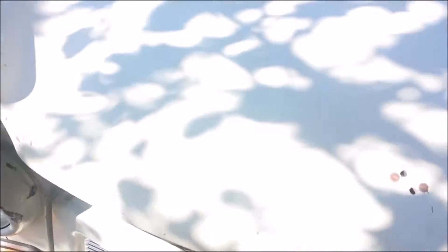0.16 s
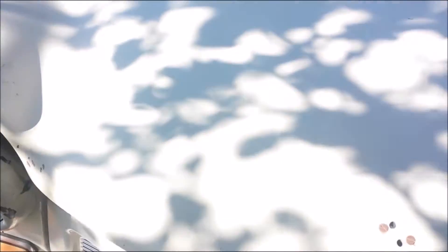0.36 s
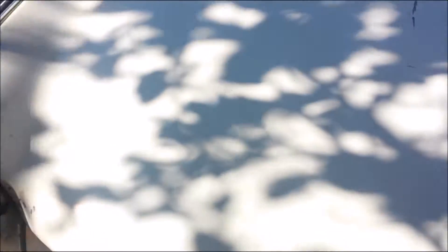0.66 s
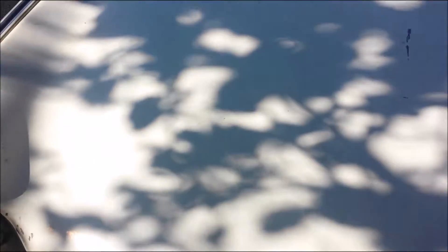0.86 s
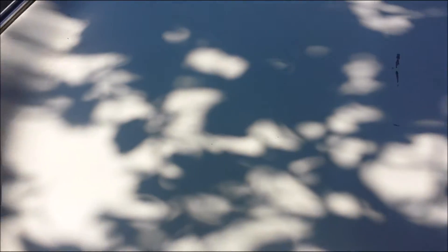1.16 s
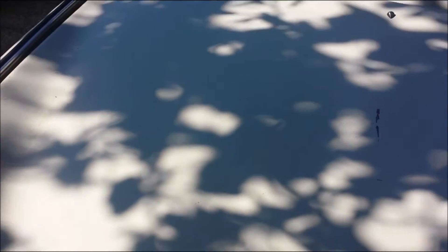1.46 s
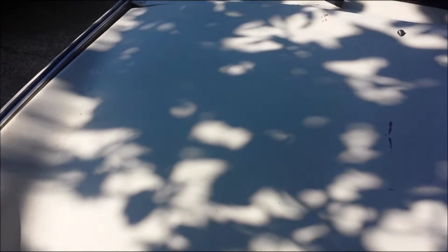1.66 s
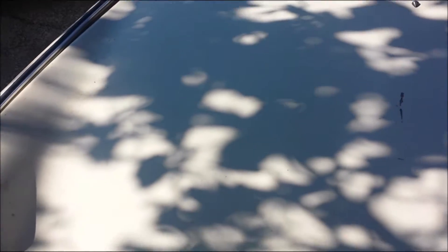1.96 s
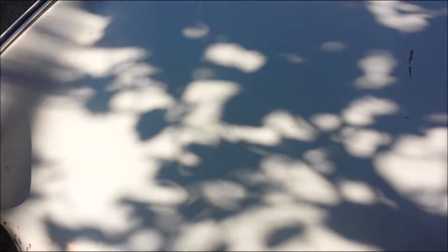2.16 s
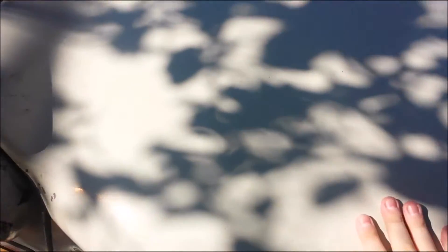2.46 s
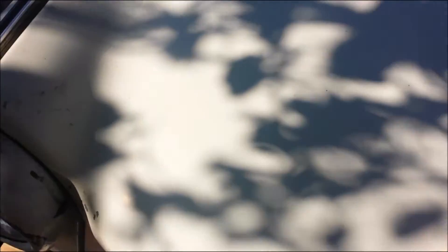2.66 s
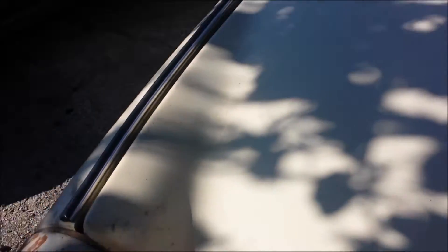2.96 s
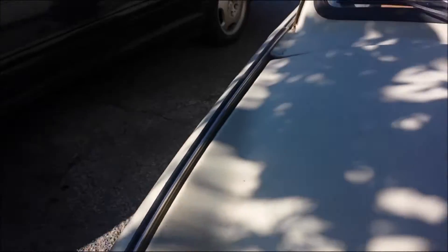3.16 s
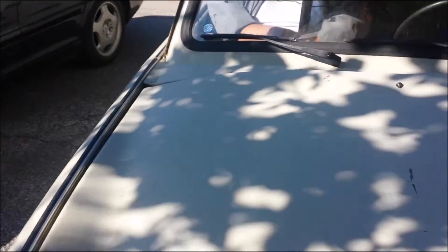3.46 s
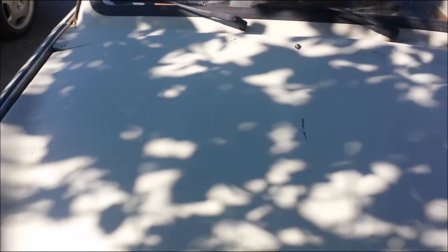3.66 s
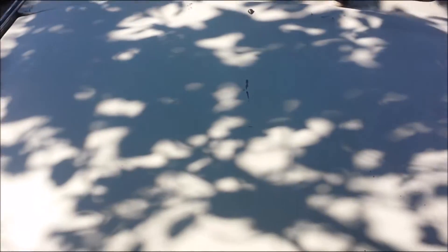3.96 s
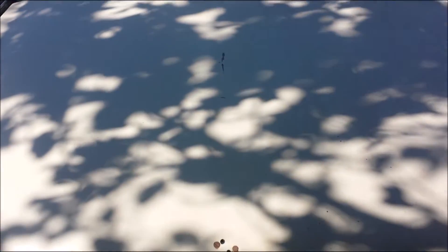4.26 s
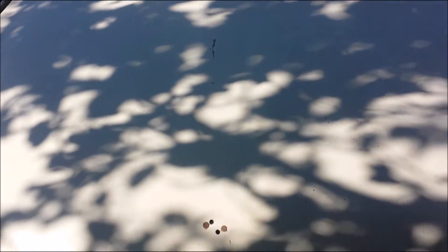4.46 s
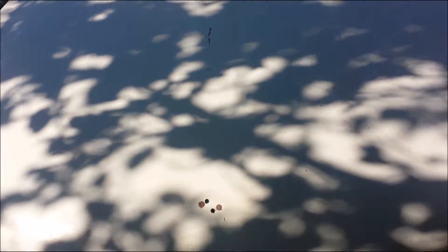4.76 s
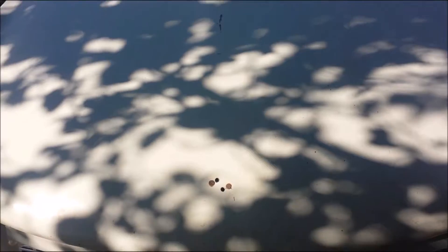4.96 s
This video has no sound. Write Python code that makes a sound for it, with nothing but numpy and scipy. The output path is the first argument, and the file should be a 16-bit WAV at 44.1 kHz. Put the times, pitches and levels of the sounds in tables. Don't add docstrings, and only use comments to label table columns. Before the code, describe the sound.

A metal car bonnet drops with hollow booming thunks, rattles and settles, then is pressed shut, followed by close rustling and gritty crackles outdoors.

```python
import sys
import numpy as np
from scipy import signal
from scipy.fft import rfft, irfft, next_fast_len
from scipy.io import wavfile
from scipy.ndimage import uniform_filter1d

SR = 44100
rng = np.random.default_rng(int(sys.argv[2]) if len(sys.argv) > 2 else 0)


def amplitude_ratio(level_db):
    exponent = np.asarray(level_db, float) / 20
    return 10 ** exponent


def store_pcm(level_fs):
    pcm = np.round(np.clip(level_fs, -1, 1) * 32767).astype(np.int16)
    wavfile.write(sys.argv[1], SR, np.atleast_2d(pcm).T)


N = 225030


def at(table, hz):
    table_hz, values = np.array(table).T
    return np.interp(np.log(hz), np.log(table_hz), values)


def pan(db):
    return amplitude_ratio(np.array([db, -db]) / 2)


def walk(rate):
    held = int(SR / rate)
    steps = np.repeat(rng.standard_normal(N // held + 1), held)
    return 1.2 * uniform_filter1d(steps, held)[:N]


def add(out, s, x):
    i = int(s * SR)
    out[..., i:i + x.shape[-1]] += x[..., :N - i]


def ring(hz, t60, phase, t):
    return np.exp(-np.log(1000) * t / t60) * np.sin(2 * np.pi * hz * t + phase)


# (frequency [Hz], likeness [0 to 1])
PORT_LIKENESS = [(30, 0.85), (200, 1), (600, 1), (2000, 0.28), (8000, 0.8), (15000, 0.2)]


def bands(per_octave=2):
    size = next_fast_len(N)
    hz = np.arange(size // 2 + 1) * SR / size + 1e-3
    like = np.clip(at(PORT_LIKENESS, hz), 0, 1)
    a, b = rfft(rng.standard_normal((2, size)))
    pair = np.array([a, like * a + np.sqrt(1 - like ** 2) * b])
    for centre in 25 * 2 ** np.arange(0, 9.4, 1 / per_octave):
        bell = np.cos(np.pi / 2 * np.clip(per_octave * np.log2(hz / centre), -1, 1))
        band = irfft(pair * bell, size)[:, :N]
        yield centre, centre / 3, band / band.std()


# (frequency [Hz], level [dB per Hz])
HISS_COLOUR = [(290, -22), (500, -23.5), (1250, -14), (1440, -19), (2160, -2.5), (6610, -3), (14900, -14),
               (16000, -25)]


def hiss(hz, wide_db):
    return amplitude_ratio(-62.5 + at(HISS_COLOUR, hz) + wide_db - 40.5)


# (frequency [Hz], level [dB], end [s])
WHISTLE = (15000, -65.5, 1.35)


def whistle():
    hz, db, end = WHISTLE
    now = np.arange(N) / SR
    return amplitude_ratio(db + 2.0 * walk(20)) * np.sin(2 * np.pi * hz * now) * (now < end)


# (time [s], level [dB])
TRAFFIC_SWELL = [(0.0, -43), (0.5, -40), (0.9, -27.5), (1.2, -46.5), (1.5, -38.5), (1.77, -44),
                 (1.9, -46.5), (2.2, -48), (2.46, -44), (2.97, -46), (3.48, -58), (3.71, -46.5),
                 (4.22, -39), (4.5, -41), (5.1, -47)]
# (frequency [Hz], level [dB per Hz])
TRAFFIC_COLOUR = [(20, -23), (45, -0.5), (132, -3), (220, -11), (374, -11.5), (809, -25.5), (2600, -30),
                  (4400, -103)]


def traffic(hz, wide_db, now):
    swell_db = np.interp(now, *np.transpose(TRAFFIC_SWELL))
    gusts_db = 2.2 * walk(5.9)
    return amplitude_ratio(swell_db + at(TRAFFIC_COLOUR, hz) + wide_db - 23.5 + gusts_db)


# (full from [s], held [s], level [dB], sheen above 7 kHz [dB re level], left minus right [dB])
STROKES = [(0.0, .17, -50, 2.5, -1), (.17, 0.17, -50, 0.5, -2), (0.389, 0.11, -46, 3.5, -1),
           (1.405, 0.027, -41.5, 8, -3), (1.8, .15, -60, 0.5, -1.5), (2.08, 0.2, -59.5, -0.5, -2),
           (2.36, 0.055, -47, 2, -3), (2.462, 0.43, -53.5, 3, -4.5), (3.42, 0.24, -64.5, 4, -6.5),
           (3.699, 0.017, -42, 1, 0.5), (3.83, .06, -40.5, 2, 4.5), (3.91, 0.023, -37, -1.5, 2.5),
           (4.036, 0.12, -35, 2.5, 2.5), (4.19, 0.11, -38, 6.5, 2.5), (4.3, 0.013, -42.5, 3, 3),
           (4.35, 0.076, -44, -1.5, 1), (4.476, 0.018, -41, 3, -3), (4.562, 0.075, -43, 0.5, 0.5),
           (4.65, 0.13, -49, 2, 5), (4.798, 0.11, -43.5, 2, 8), (4.92, 0.54, -47, 4.5, 3.5)]


def strokes(now):
    s, held, db, sheen_db, pan_db = np.transpose(STROKES)[:, :, None]
    rise_db = 276.5 * np.maximum(s - now, 0)
    fall_db = 206 * np.maximum(now - s - held, 0)
    power = amplitude_ratio(2 * np.maximum(db - rise_db - fall_db, -120))
    total = power.sum(axis=0)
    return 10 * np.log10(total), (power * sheen_db).sum(axis=0) / total, (power * pan_db).sum(axis=0) / total


def fibre_jerks():
    spikes = amplitude_ratio(np.minimum(3.0 * rng.exponential(size=N), 8)) * (rng.random(N) < .012)
    jerks = signal.lfilter([1], [1, -.975], spikes)
    return (.85 + jerks / jerks.mean() * .36) * amplitude_ratio(1.2 * walk(40))


# (frequency [Hz], level [dB per Hz])
CLOTH_COLOUR = [(240, -15), (500, -13), (990, -4.5), (1760, -17), (2320, -1), (6540, -5), (11900, -17.5),
                (16000, -15)]


def cloth(hz, wide_db, jerks, level_db, sheen_db):
    sheen = np.clip(np.log2(hz / 5000), 0, 1) * (sheen_db - 0.5)
    return jerks * amplitude_ratio(level_db + sheen + at(CLOTH_COLOUR, hz) + wide_db - 38.0 + 2.0 * walk(25))


def pocket():
    hz, width_hz = 2260, 170
    sos = signal.butter(2, [hz - width_hz / 2, hz + width_hz / 2], "band", fs=SR, output="sos")
    band = signal.sosfilt(sos, rng.standard_normal((2, N)))
    rustle_db = strokes(np.arange(N) / SR)[0]
    level = np.hypot(amplitude_ratio(rustle_db - 13), amplitude_ratio(-77.5))
    return band / band.std() * level * amplitude_ratio(3.6 * walk(15))


# (time [s], peak level [dB], centre [Hz], left minus right [dB])
FINGER_TICKS = [(0.0138, -26, 5640, 4), (0.072, -34.5, 5640, 15), (0.0988, -33.5, 5460, 11),
                (0.1506, -26, 6060, -3), (0.1885, -30, 3450, 2), (0.21, -40, 2220, -11),
                (0.2573, -37.5, 2260, -6), (0.416, -33, 7700, -7), (1.0989, -38, 2830, 3),
                (1.256, -24.5, 8000, -5), (1.832, -37.5, 5500, -14), (2.0735, -41.5, 6250, 13.5),
                (2.2176, -24, 7060, -2), (2.3294, -36.5, 3080, -14.5), (2.3501, -47, 5000, -2.5),
                (2.5606, -25.5, 5700, 7.5), (2.6425, -29, 5510, 1), (2.684, -38, 6470, -3),
                (2.696, -32.5, 4750, 0), (2.721, -30, 4210, -0.5), (1.2445, -36, 6000, -1.5),
                (1.273, -36, 5800, 7), (1.4135, -21, 7500, -0.5), (2.997, -46, 10600, 2),
                (2.6564, -17, 4200, 1), (2.6654, -31, 2450, -4), (2.976, -37, 3260, -9.5),
                (2.9894, -40.5, 4770, -9.5), (3.041, -37.5, 3100, -5.5), (3.0846, -44, 3000, -0.5),
                (3.3009, -42.5, 6500, 18.5), (3.424, -45, 2300, 0), (3.4832, -39, 4270, -4),
                (3.6028, -39, 4470, -2)]
# (time [s], peak level [dB], centre [Hz], left minus right [dB])
SOLE_GRIT = [(3.6646, -31.5, 3990, -6), (3.696, -28.5, 2295, 6), (3.7994, -30.5, 6430, -5),
             (3.8351, -24.5, 4380, -3), (3.907, -27, 4500, 9), (3.912, -14.5, 4000, 2),
             (3.963, -25, 4000, 7), (3.9533, -21.5, 2910, 8), (4.056, -31.5, 6000, 5),
             (4.106, -22.5, 5500, 1), (4.211, -27, 3500, 12), (4.27, -27, 5000, 5), (4.29, -25, 5000, 5),
             (4.0449, -18.5, 2300, 7), (4.1083, -19, 2560, 5), (4.1167, -19, 3040, 15),
             (4.156, -26, 5140, 1), (4.2455, -28, 4000, 6), (4.2841, -18, 2600, 4), (4.417, -16.5, 4260, 6),
             (4.459, -18.5, 8650, -9), (4.4783, -18.5, 2800, 7), (4.484, -19.5, 3400, 7.5),
             (4.489, -26.5, 4500, 5), (4.55, -15.5, 4000, -13), (4.641, -27.5, 7000, -3),
             (4.792, -23.5, 6200, -6), (4.8, -19, 5530, 14), (4.8064, -22, 4920, 0), (4.862, -33, 4830, 10),
             (4.9831, -27, 2440, 7), (5.0855, -23.5, 4800, 9)]
# (time [s], peak level [dB], centre [Hz], left minus right [dB])
DULL_KNOCKS = [
    (4.881, -33.5, 850, -2),
    (4.895, -28.5, 960, 10),
    (4.912, -25, 1030, 1),
    (4.953, -29, 1770, 6),
]
# (time [s], peak level [dB], centre [Hz], left minus right [dB])
DRY_SNAPS = [(0.4095, -22, 7050, -6), (1.3872, -8, 8480, 2), (1.3875, -15, 3500, 0), (3.9415, -10, 2900, 6),
             (4.0034, -12, 3130, 9), (4.5455, -9.5, 8800, -9), (4.525, -7, 7560, -9.5),
             (4.5835, -14, 2480, 3.5), (4.457, -20, 6500, -4), (4.5135, -26, 5000, -4),
             (4.517, -28, 12000, -4.5), (4.556, -27, 6000, -6), (4.573, -28, 6500, -1),
             (4.647, -25, 9000, -3), (4.653, -23, 10000, -1), (4.664, -30, 8500, 0),
             (4.672, -23, 8000, -0.5), (3.941, -23.5, 9000, 3.5), (4.0036, -17, 9600, 3),
             (4.4175, -16.5, 9500, -1), (3.9075, -24, 10000, -1), (4.156, -18.5, 8400, -0.5),
             (0.602, -28, 4500, -1), (1.407, -27, 11000, -2), (1.43, -28, 10000, -2),
             (1.447, -28, 9500, -2), (1.489, -33, 8000, -2), (0.5455, -8, 650, -1), (3.629, -36, 11500, -3),
             (3.665, -36, 11000, -3), (3.77, -35, 13000, -3), (3.801, -31, 13500, -3),
             (0.743, -31, 9000, -2), (0.749, -34, 8000, -2), (4.047, -24, 8000, 2)]


def ticks():
    out, t = np.zeros((2, N)), np.arange(900) / SR
    rows = [row + (0,) for row in FINGER_TICKS + SOLE_GRIT + DULL_KNOCKS]
    rows += [row + (-11,) for row in DRY_SNAPS]
    chance = rng.standard_normal((len(rows), 2, len(t)))
    for (s, db, hz, pan_db, dry_db), (a, b) in zip(rows, chance):
        scatter_db = dry_db - 7.5 - 7 * np.log2(hz / 3000)
        snap = ring(hz, 7.6 / hz, 0, t)
        scatter = amplitude_ratio(scatter_db) * np.exp(-t / 0.0042) * np.array([a, 0.77 * a + 0.76 * b])
        sos = signal.butter(2, [hz / 2.3, min(hz * 2.23, 19000)], "band", fs=SR, output="sos")
        grain = signal.sosfilt(sos, snap + scatter)
        add(out, s + 0.0007, amplitude_ratio(db + 3.5) * pan(pan_db)[:, None] * grain)
    return out


# (frequency [Hz], level [dB], t60 [s])
LEVER_MODES = [(1193, -11, 0.21), (2125, -6, 0.11), (2190, -2.5, 0.27), (2500, -0.5, 0.11),
               (3320, -9, 0.11), (3800, -11.5, .08), (4080, -0.5, 0.073), (4450, 2, 0.099),
               (4800, -17, .09), (5500, -8, 0.069), (6400, -8, .1), (6600, -9.5, 0.06), (7260, -15, 0.07),
               (8900, -16, .05)]
# (time [s], length [s], level [dB], tilt about 3 kHz [dB per octave], left minus right [dB])
LEVER_SCRAPES = [(0.685, 0.024, -38.5, 5, 2.5), (0.716, 0.013, -51, -3, -2),
                 (0.785, 0.0088, -21.5, 5.5, -1), (1.187, 0.024, -44, 0, -2.5),
                 (1.243, 0.0099, -43.5, 0, -2.5), (1.295, 0.011, -43.5, 0, 2), (1.312, .008, -52, -2, -3),
                 (1.328, 0.0081, -34, -10.5, -2), (1.36, 0.014, -28.5, -8, 5), (1.528, 0.035, -43.5, 2, 2),
                 (1.64, 0.07, -38, -14.5, -2), (1.671, 0.015, -28.5, 2, 3), (1.691, 0.021, -23.5, 2, 3.5),
                 (1.731, 0.012, -38.5, -9, -0.5), (2.61, 0.037, -52, -4, -1), (2.729, 0.025, -29.5, 2, 3)]


def lever():
    out = np.zeros((2, N))
    chance = rng.standard_normal((len(LEVER_SCRAPES), 3, 2600))
    for (s, length, db, tilt_db, pan_db), (a, b, c) in zip(LEVER_SCRAPES, chance):
        u = np.arange(9000) / SR / length
        grit = amplitude_ratio(4.0 * uniform_filter1d(c, size=40) * 6)
        push = np.pad(np.array([a, 0.87 * a + .8 * b]) * grit, ((0, 0), (0, 6400)))
        push = push * np.exp(-u ** 3) * pan(pan_db)[:, None]
        for (hz, mode_db, t60), g in zip(LEVER_MODES, c):
            r = np.exp(-np.log(1000) * 1.8 / (t60 * SR))
            turn = 2 * np.pi * hz / SR
            mode = signal.lfilter([np.sin(turn)], [1, -2 * r * np.cos(turn), r * r], push)
            level = amplitude_ratio(db + mode_db + tilt_db * np.log2(hz / 3000) + 1.6 * g)
            add(out, s, level * mode / np.sqrt(length * SR))
    return out


def cluster(hz, db, t60, spread_hz):
    off, left, right = rng.standard_normal((3, 12))
    t = np.arange(int(min(t60, 1) * SR)) / SR
    offsets = np.linspace(-1, 1, len(off)) + .07 * off
    modes = np.array([ring(hz + spread_hz * o, t60, 0, t) for o in offsets])
    modes = modes * np.minimum(t * hz / 2.3, 1) ** 2
    weights = np.hanning(len(off) + 4)[2:-2] * (0.41 + np.array([left, 0.67 * left + 0.6 * right]))
    return amplitude_ratio(db - 6.0) * weights @ modes


# (start [s], end [s], frequency [Hz], level [dB], second harmonic
# [dB], unevenness [0 to 1])
SQUEALS = [
    (1.6705, 1.712, 2180, -16, -21, 0.47),
    (1.711, 1.746, 2190, -33, -20, 0.88),
    (4.015, 4.047, 996, -37.5, -27, .45),
    (4.052, 4.1, 1004, -37, -25, 0.27),
]
# (time [s], frequency [Hz], level [dB], t60 [s])
LATCH_CLANGS = [(0.5457, 960, -12.5, 0.13), (0.5474, 2570, -23, 0.069), (0.6865, 4230, -37, 0.09),
                (0.885, 1034, -11, 0.057), (1.1861, 3940, -39.5, 0.11), (1.1895, 2106, -38, 0.064),
                (1.2515, 2230, -41, 0.13), (1.2727, 1195, -36.5, 0.038), (1.2995, 2220, -39, 0.055),
                (1.3874, 2500, -11, 0.034), (1.3855, 3720, -23, 0.054), (1.6334, 2470, -40, 0.15),
                (1.6955, 3360, -25, 0.12), (2.606, 2535, -45, 1), (2.7353, 1252, -14.5, 0.052),
                (2.736, 3250, -16, 0.056)]
# (time [s], frequency [Hz], level [dB], t60 [s], spread [Hz])
LATCH_SPRINGS = [(0.7865, 5894, -10.5, 0.049, 1200), (1.3292, 1900, -15, 0.04, 1900),
                 (1.3608, 2600, -13.5, 0.07, 900), (1.6355, 1300, -43.5, 0.3, 100),
                 (1.672, 3000, -27, 0.12, 80), (1.6945, 4800, -20, 0.1, 100), (1.6995, 950, -36, 0.23, 40),
                 (1.708, 4480, -30, 0.09, 120), (1.7205, 2185, -37, 0.68, 30),
                 (2.6778, 358, -13, 0.063, 83), (2.7332, 387, -7.5, 0.063, 82),
                 (2.7345, 10000, -14, 0.034, 2200), (2.79, 4890, -40, 0.6, 120),
                 (2.679, 149, -13, 0.079, 23), (1.6935, 6400, -29.5, 0.1, 90), (1.672, 6550, -27, 0.1, 200),
                 (1.372, 2900, -21.5, 0.05, 560), (0.547, 5800, -27, 0.06, 280), (2.82, 110, -22, 0.28, 22),
                 (2.677, 1550, -32, 0.049, 190), (2.778, 2800, -28, .05, 150),
                 (2.843, 700, -37, 0.045, 244), (2.885, 750, -34, 0.036, 250),
                 (2.748, 800, -17, 0.072, 250), (1.33, 2700, -21, 0.027, 500),
                 (0.8785, 5800, -18, 0.056, 1200)]


def latch():
    out, t = np.zeros((2, N)), np.arange(SR) / SR
    wobble = walk(380)
    for start, end, hz, db, second_db, rough in SQUEALS:
        u = t[:int((end - start) * SR)]
        shake = wobble[int(start * SR):][:len(u)]
        phase = 2 * np.pi * np.cumsum(hz * (1 + 0.011 * rough * shake)) / SR
        edge = np.clip(np.minimum(u / 0.0033, (u[-1] - u) / 0.015), 0, 1)
        tone = np.sin(phase) + amplitude_ratio(second_db) * np.sin(2 * phase)
        add(out, start, amplitude_ratio(db) * edge * (1 + rough * shake) * tone)
    for s, hz, db, t60 in LATCH_CLANGS:
        add(out, s, cluster(hz, db, t60, spread_hz=291))
    for s, hz, db, t60, spread_hz in LATCH_SPRINGS:
        add(out, s, cluster(hz, db, t60, spread_hz))
    return out * pan(-0.5)[:, None]


# (time [s], boom [dB], clank [dB re boom], rattle [dB re boom], ring time [factor])
DROP_BLOWS = [(0.545, -3, -0.5, -15, 1.34), (0.607, -8, -4.5, -33, 0.39), (0.684, -26.5, -8.5, -5, 2),
              (0.707, -10.5, -19, -23, 2.2), (0.74, -12, -16, -14, 0.18), (0.785, 1.1, -3.5, -5.5, 1.27),
              (0.808, -1, -6, -50.5, 1.8), (0.878, 2, -15, -12.5, 0.9), (0.89, -6.5, 4, -35, 1.04),
              (0.947, -24, -22.5, -14.5, 16), (1.028, -40.5, -42, -18.5, 7.9)]
# (time [s], boom [dB], clank [dB re boom], rattle [dB re boom], ring time [factor])
SETTLE_BLOWS = [(1.186, -50, 15, 8, 3), (1.254, -33, 4, 3, 0.3), (1.271, -25.5, 6, -10, 0.64),
                (1.298, -24.5, -7, -13.5, 13), (1.328, -5, 1.5, -22.5, 0.44),
                (1.36, 1.5, -7.5, -20.5, 1.35), (1.386, -3.5, -9.5, -12.5, 1.66),
                (1.432, -21.5, -20.5, 0, 0.49), (1.632, -27, -1, -13.5, 3.7), (1.67, -15.5, -1, -5.5, 1.62),
                (1.7, -16.5, 10, -2.5, 0.78)]
# (time [s], boom [dB], clank [dB re boom], rattle
# [dB re boom], ring time [factor])
PRESS_AND_STEP_BLOWS = [(2.255, -37.5, -3, -10, 0.46), (2.605, -32, 0, -17, 13), (2.622, -29, -7.5, -20, 4.7),
                        (2.64, -24, -4, -27, 3.9), (2.677, -8.5, -17, -26, 3.3), (2.732, -6.5, -1.5, 2, 0.95),
                        (2.759, -7.5, -1.5, -9.5, 1.17), (2.82, -24, -11, -10, 2.1), (3.041, -33.5, -18.5, -18, 2.2),
                        (3.378, -42.5, 12.5, -4.5, 0.77), (3.656, -42, -27, -27, 5.1), (4.145, -20, -2, -53, 0.96),
                        (4.339, -24, -14, -25, 3.1), (4.524, -20, -5, -3, 0.25)]
# (frequency [Hz], t60 [s])
SHEET_FADE = [(100, 0.23), (300, 0.21), (1000, 0.22), (3000, 0.22), (8000, 0.2), (15000, 0.17)]
# (frequency [Hz], left minus right [dB])
SHEET_SIDE = [(500, 2), (2000, -0.5), (4000, 0), (8000, 1.7)]


def sheet_envelope(hz):
    power, t = np.zeros((2, N)), np.arange(SR // 2) / SR
    crack = amplitude_ratio(2 * 0.5) * np.exp(-t / 0.0046) * (hz > 600)
    side = pan(at(SHEET_SIDE, hz)) ** 2
    for s, db, clank_db, rattle_db, longer in DROP_BLOWS + SETTLE_BLOWS + PRESS_AND_STEP_BLOWS:
        share_db = at([(250, -10.5), (1000, clank_db), (4500, rattle_db)], hz)
        t60 = longer * at(SHEET_FADE, hz)
        size = min(int(t60 * SR), len(t))
        u = t[:size]
        choke_s = 0.2 if s > PRESS_AND_STEP_BLOWS[0][0] else 0.45
        tail = np.exp(-2 * np.log(1000) * u / t60 - (u / choke_s) ** 3)
        onset = np.minimum(u / .0012, 1) ** 2
        add(power, s + 0.0011, np.outer(side, amplitude_ratio(2 * (db + share_db)) * (tail + crack[:size]) * onset))
    return np.sqrt(power)


# (frequency [Hz], level [dB per Hz])
SHEET_COLOUR = [(47, -43), (80, -3), (309, -4), (958, -15.5), (1400, -11), (5640, -10), (14300, -25.5),
                (16000, -50)]


def sheet(hz, wide_db):
    usual_share_db = at([(250, -7.5), (1000, 4.5), (4500, 7.5)], hz)
    return sheet_envelope(hz) * amplitude_ratio(at(SHEET_COLOUR, hz) - usual_share_db + wide_db - 33)


def noises():
    now = np.arange(N) / SR
    cloth_db, sheen_db, pan_db = strokes(now)
    jerks = fibre_jerks() * pan(pan_db)
    out = 0
    for hz, width, noise in bands():
        wide_db = 10 * np.log10(width)
        power = hiss(hz, wide_db) ** 2 + traffic(hz, wide_db, now) ** 2
        power = power + cloth(hz, wide_db, jerks, cloth_db, sheen_db) ** 2 + sheet(hz, wide_db) ** 2
        out = out + noise * np.sqrt(power)
    return out


# (frequency [Hz], level [dB], t60 [s])
FREE_MODES = [(69.3, -12, 0.93), (97.8, -8, 0.97), (120.7, -12, 1), (155, -14.5, 0.76), (179.5, -8, 0.59),
              (231, -12.5, 0.061), (283.9, -5, 0.31), (305.4, -5.5, 0.36), (391.6, -15, 0.54),
              (415, -14.5, 0.49), (530, -11.5, 0.36)]
# (frequency [Hz], level [dB], t60 [s])
RESTING_MODES = [(69.5, -26, 0.28), (98.8, -13.5, 0.99), (135.3, -8.5, 0.7), (158.8, -6, 0.45),
                 (187.6, -8, 0.61), (293, -4, 0.49), (348.4, 0, 0.21), (428.3, -6.5, 0.21), (488, -11, 0.2),
                 (546, -11, 0.34)]
# (frequency [Hz], level [dB], t60 [s])
PRESSED_MODES = [(85, -9, 0.65), (138.6, -10.5, 0.46), (199, -12, 0.59), (282, -11, 0.47), (360.3, 0, 0.14),
                 (417, -4.5, 0.18), (491, -13.5, 0.44), (556.7, -9.5, 0.4), (665, -9.5, 0.041),
                 (808, -13, 0.22)]
CHOKE_TIMES = (.35, 0.29, 0.21)


def panel_mode(hz, db, t60, g, d, t):
    skew = np.array([[-1], [1]]) * 0.31 * np.tanh(d) * min(hz / 450, 1) ** 2
    beat = 1 - np.cos(2 * np.pi * (9.0 + 3.5 * abs(g)) * t)
    throb = 1 - 0.2 * min(hz / 250, 1) ** 2 * beat
    return np.sign(g + .8) * amplitude_ratio(db + 1.5 * g) * throb * ring(hz * (1 + 0.0196 * d), t60, skew, t)


def boom():
    out, t = np.zeros((2, N)), np.arange(int(.55 * SR)) / SR
    stages = zip((DROP_BLOWS, SETTLE_BLOWS, PRESS_AND_STEP_BLOWS), (FREE_MODES, RESTING_MODES, PRESSED_MODES), CHOKE_TIMES)
    for blows, modes, choke_s in stages:
        onset = np.sin(np.pi / 2 * np.minimum(t / 0.0013, 1)) ** 2
        shape = np.exp(-(t / choke_s) ** 3) * onset
        shape = shape * (1 + 0.4 * np.exp(-t / 0.0052))
        chance = rng.standard_normal((len(blows), 2, len(modes)))
        for (s, db, _, _, longer), (share, detune) in zip(blows, chance):
            x = 0
            for (hz, mode_db, t60), g, d in zip(modes, share, detune):
                x = x + panel_mode(hz, mode_db, t60 * min(longer, 1.1), g, d, t)
            add(out, s + .0015, amplitude_ratio(db - 12.5) * x * shape * np.array([[.95], [1.05]]))
    return out


def scene():
    return whistle() + noises() + pocket() + ticks() + lever() + latch() + boom()


def top_cut(x):
    return signal.sosfilt(signal.butter(12, 15900, fs=SR, output="sos"), x)


# (frequency [Hz], left minus right [dB])
PORT_TILT = [(100, -2), (1500, -3), (3500, -2), (5800, 5), (7200, -1), (8500, -8), (13000, -11.5)]


def record(dry):
    size = next_fast_len(N + 4096)
    hz = np.arange(size // 2 + 1) * SR / size + 1e-3
    lead = np.exp(.5j * 1.61 * np.tanh(hz / 1560))
    half = amplitude_ratio(at(PORT_TILT, hz) / 2) * lead
    top_hz, low_hz = 15500, 57
    ends = 1 / np.sqrt(1 + (hz / top_hz) ** 160) / (1 - 1j * low_hz / hz)
    ports = irfft(rfft(dry, size) * ends * np.array([half, 1 / half]), size)[:, :N]
    rounded = np.clip(1.1 * np.tanh(ports / 1.1), -1, 1)
    return top_cut(rounded)


dry = scene()
out = record(dry)
store_pcm(out)
```